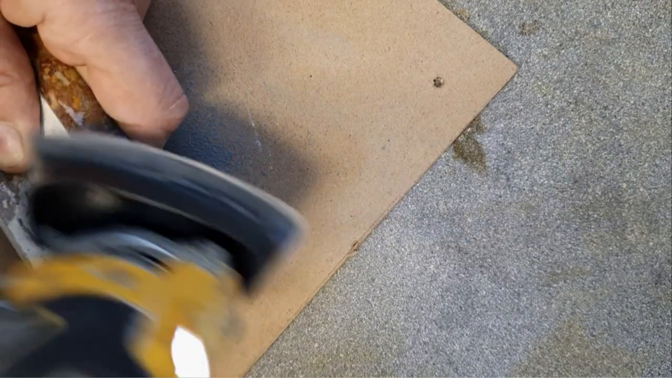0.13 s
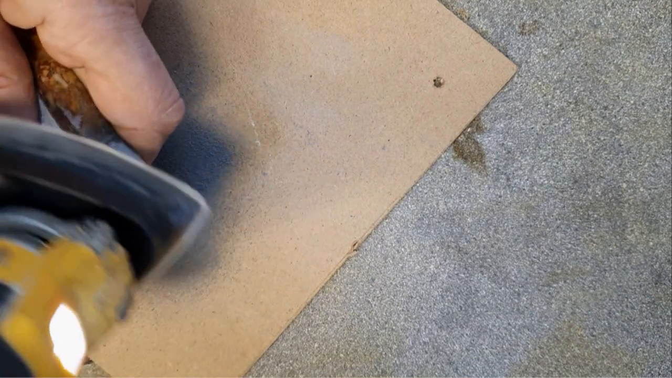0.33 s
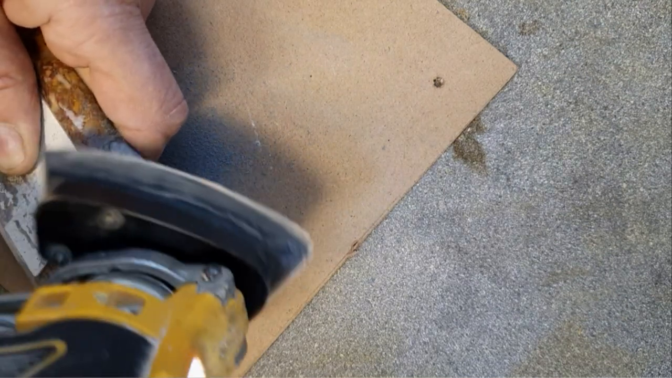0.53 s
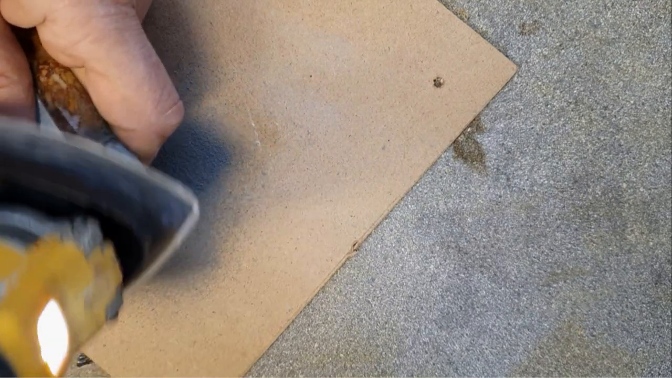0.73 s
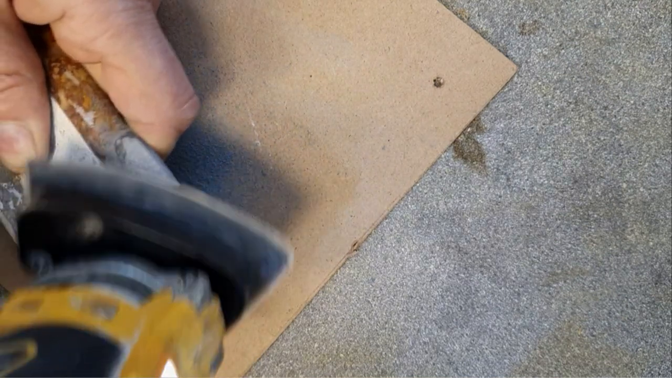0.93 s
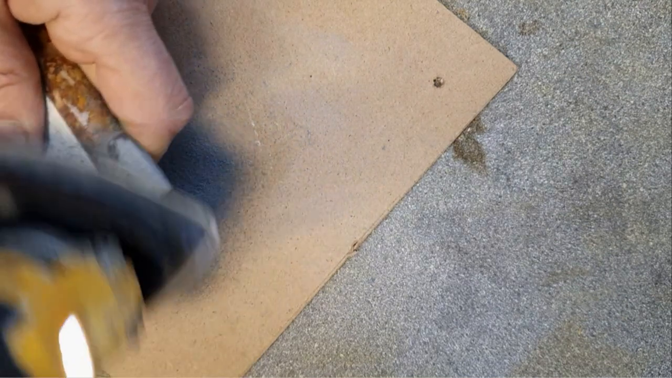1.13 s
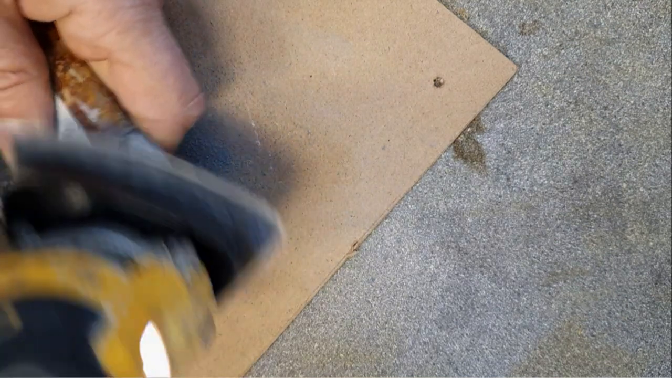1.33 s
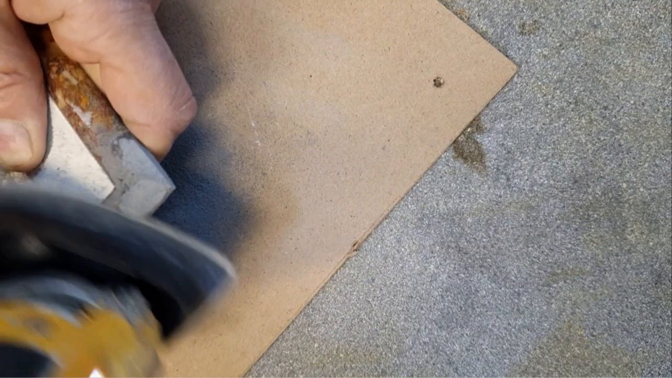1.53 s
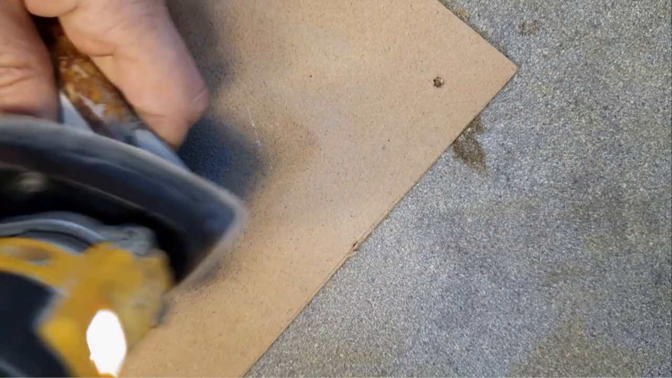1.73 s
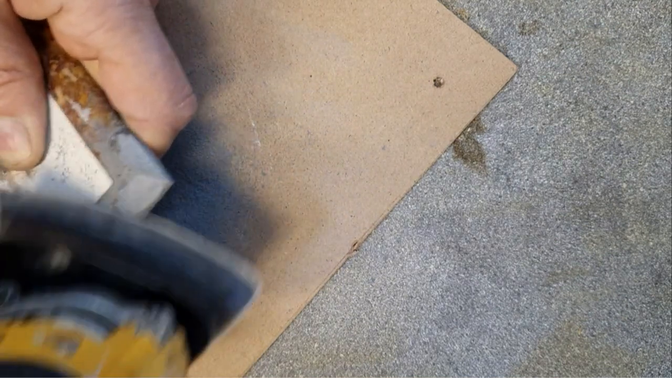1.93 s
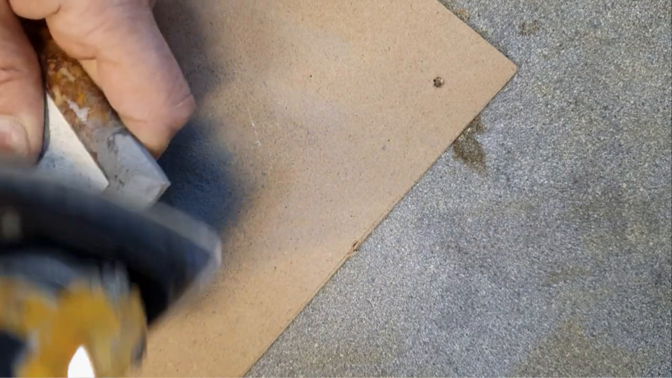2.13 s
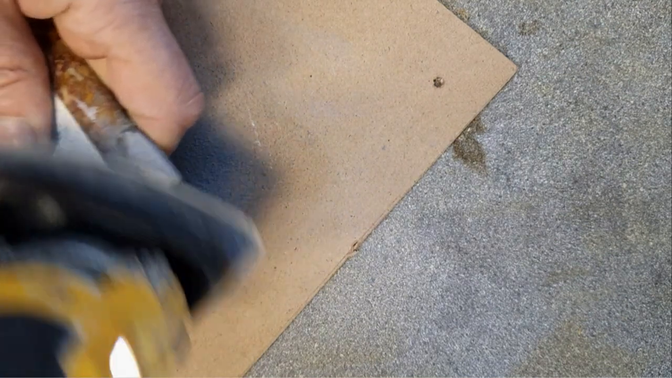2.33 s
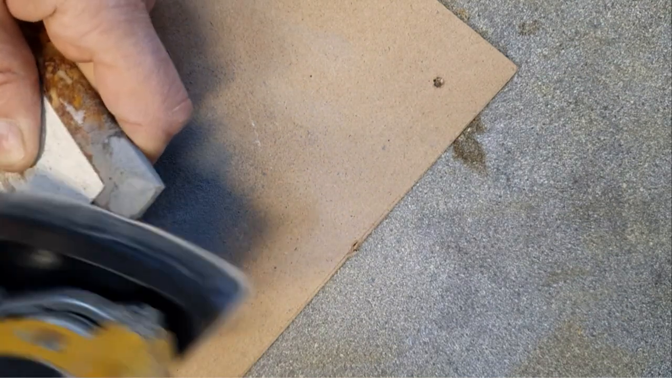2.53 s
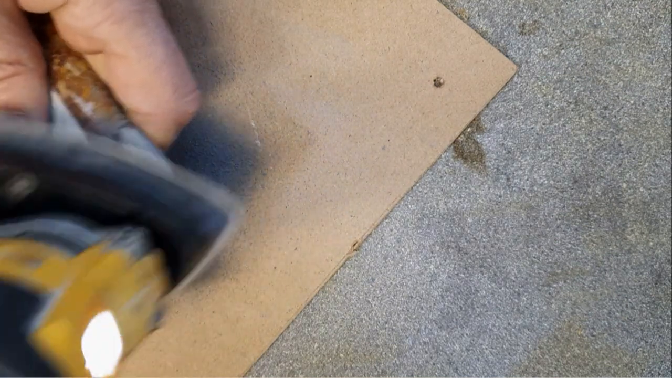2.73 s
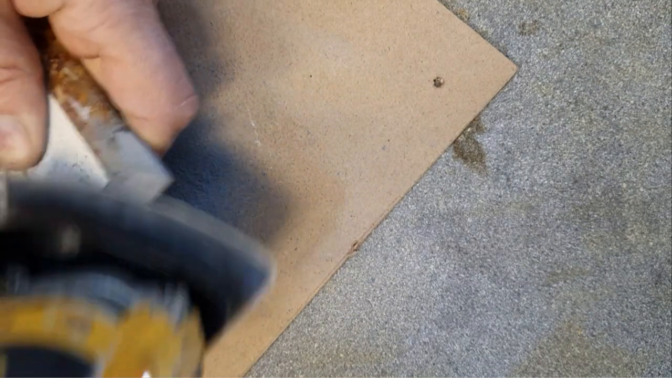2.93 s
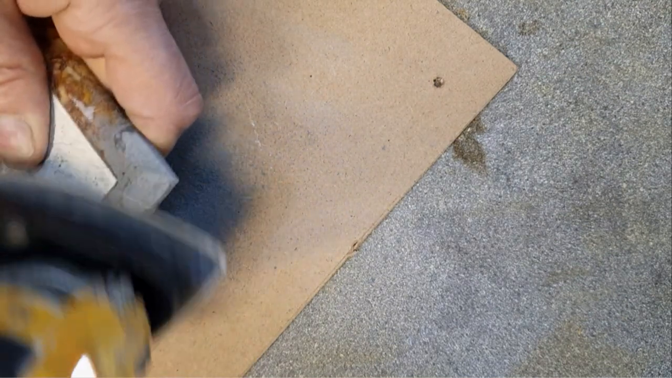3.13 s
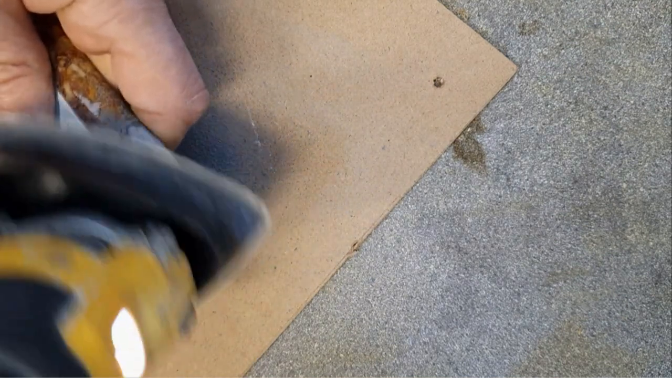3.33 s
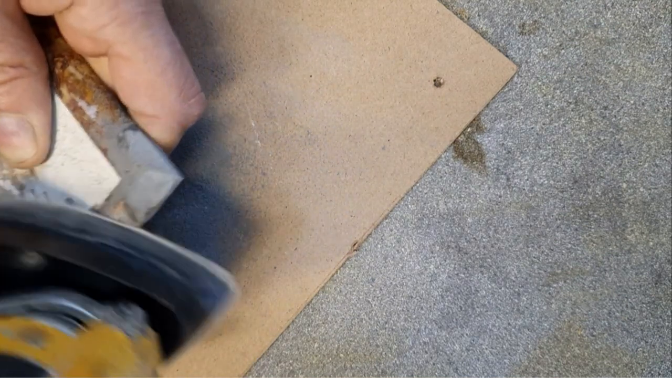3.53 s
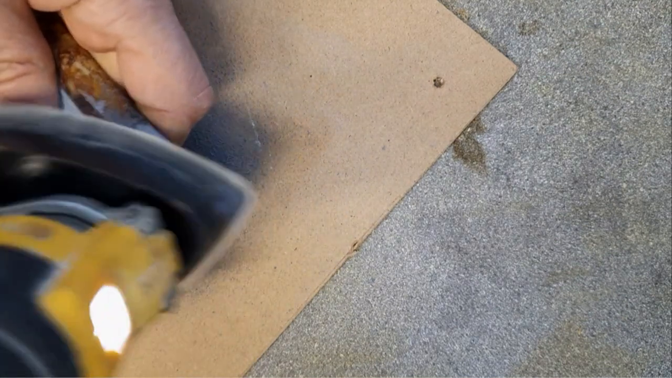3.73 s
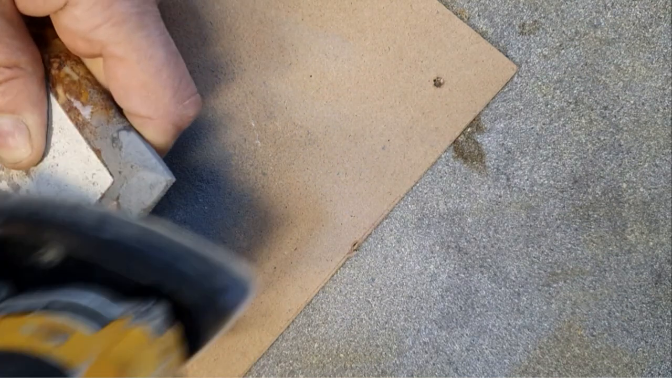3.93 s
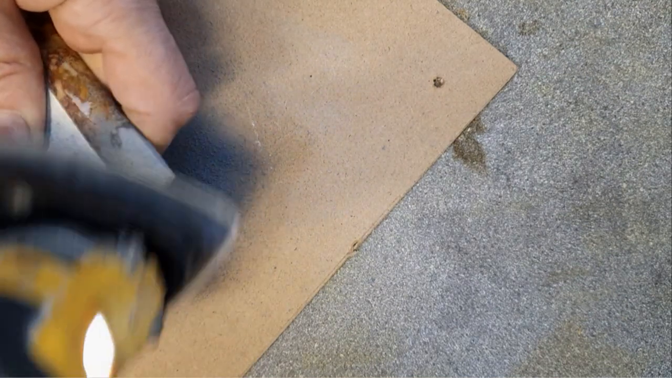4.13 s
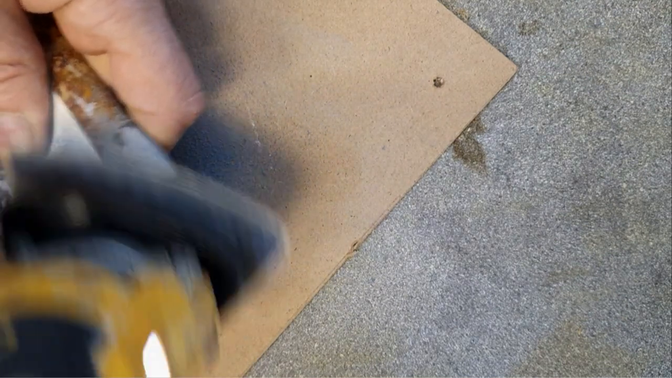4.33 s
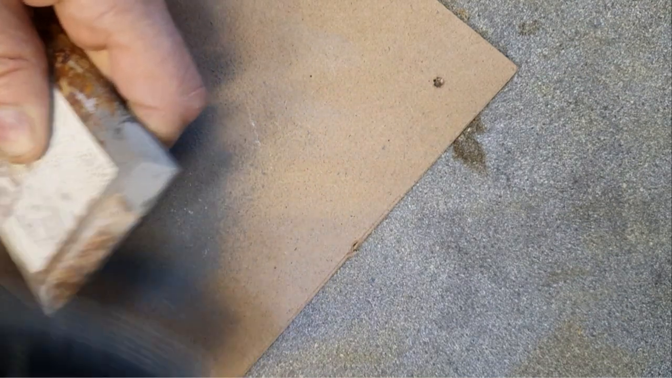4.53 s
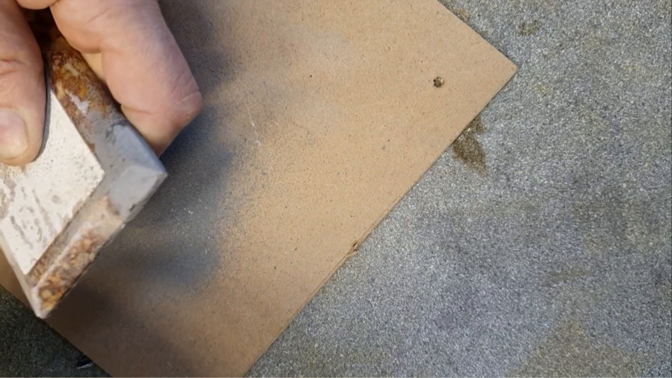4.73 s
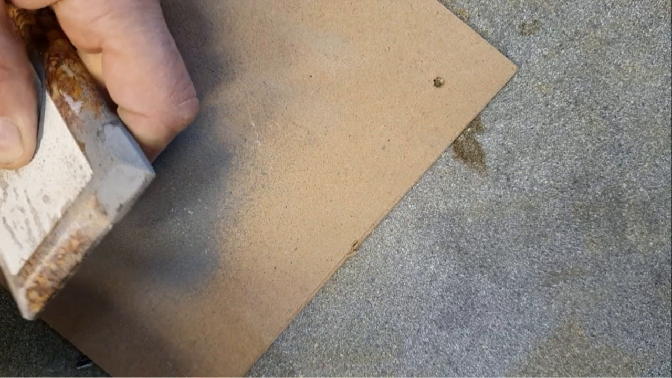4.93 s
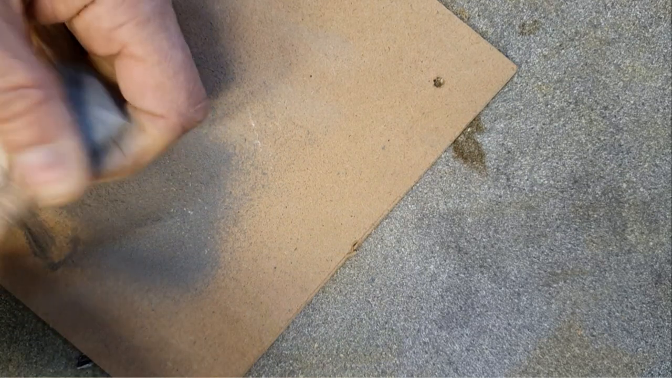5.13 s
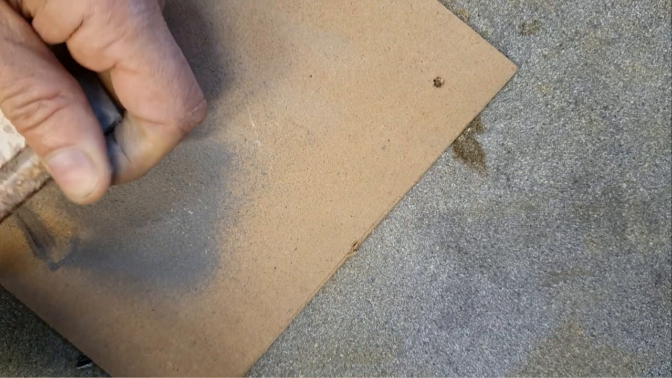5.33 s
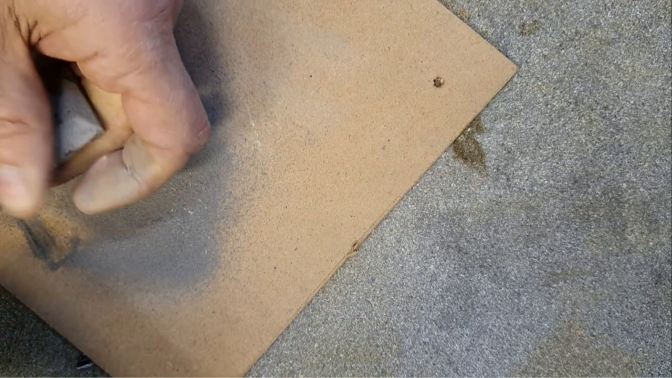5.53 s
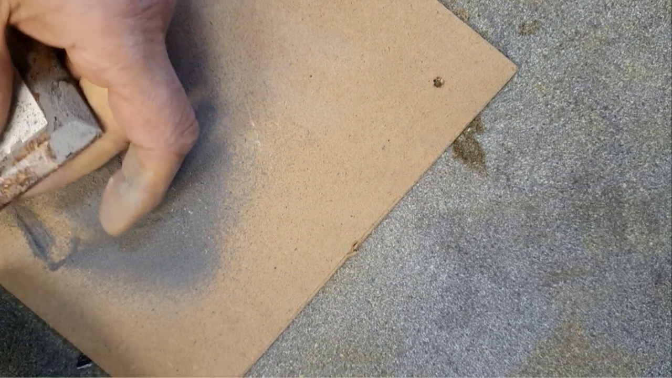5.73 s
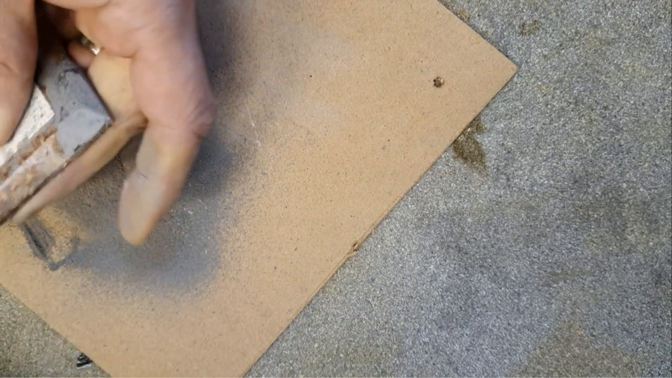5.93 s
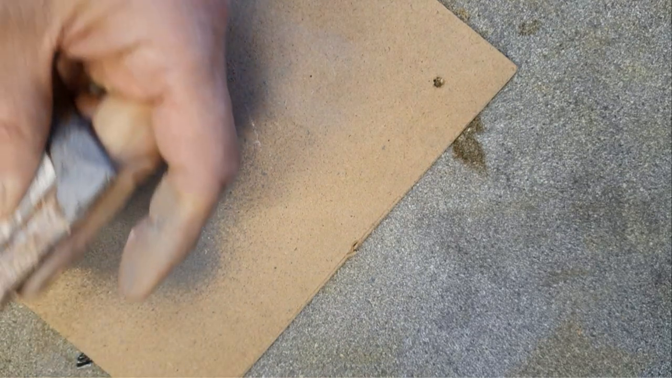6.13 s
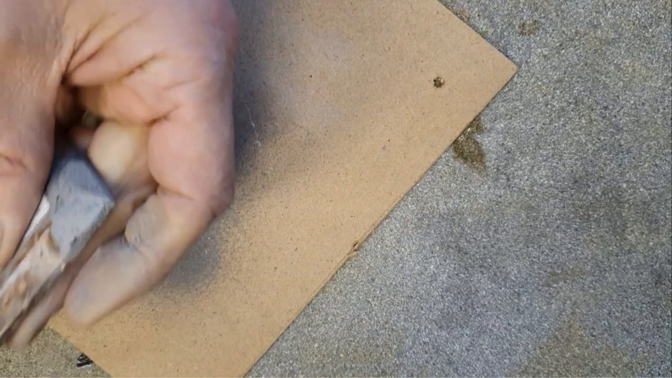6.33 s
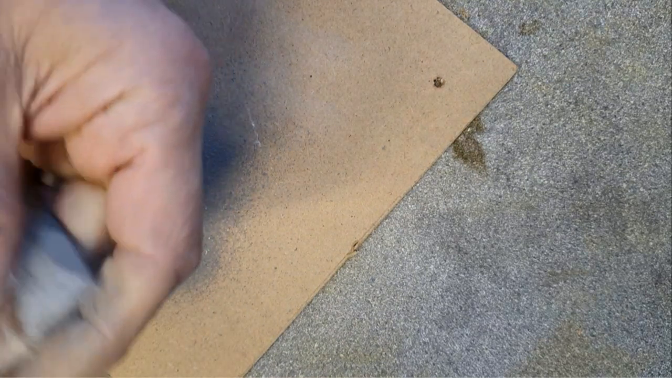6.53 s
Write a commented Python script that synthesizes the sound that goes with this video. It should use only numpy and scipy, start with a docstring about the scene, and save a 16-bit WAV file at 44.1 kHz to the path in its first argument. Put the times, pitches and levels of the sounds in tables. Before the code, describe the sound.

From 0 to about 4.6 seconds an electric oscillating sander runs very close, in stereo: a steady, dense buzz of roughly 215 cycles a second with strong mid overtones, a piercing whine around 3.4 kHz and a dry, bright grit rasp. To-and-fro strokes make the drone swell, bite and briefly drop about every third of a second, with rough chatter at the edge, stronger from 1.4 seconds on. Brief squeals colour the first 1.4 seconds. At 4.6 seconds it howls briefly, brakes and cuts off within a tenth of a second, leaving a short room tail and very quiet air. Around 5.1-5.2 a quick clatter and scrape sound on the bench; near 5.5 comes a faint hollow rub. At 5.86 a dull thump begins a scrape, followed at 6.08 by a harder, booming bump with a small crack. Faint hand brushing closes, at 6.5-6.7.

```python
"""Sanding hard filler, then putting the sander down

An oscillating sander buzzes at a steady speed, built from multiples of its shaft speed, as it is stroked to and fro.
Filtered noise makes the rasp of the grit, and slaps of noise the chatter where the pad rides over the work's edge.
The pad squeals at times; the motor is switched off and brakes, and the tool clatters onto the bench as filtered clicks.
The workpiece is scraped round as noise and bumps the board twice, which booms as dying sines, in a quiet workshop.
"""
import sys
import numpy as np
from scipy import signal
from scipy.fft import rfft, irfft
from scipy.io import wavfile

SR = 44100
rng = np.random.default_rng(int(sys.argv[2]) if len(sys.argv) > 2 else 0)


def output_pcm(signal):
    """Save a mono or channel-first signal as 16-bit PCM at the path in sys.argv[1].

    Samples are clipped to [-1, 1] before scaling.
    """
    pcm = np.clip(np.atleast_2d(signal).T, -1, 1) * 32767
    wavfile.write(sys.argv[1], SR, np.round(pcm).astype(np.int16))


N = 293688
T = np.arange(N) / SR
HZ = np.fft.rfftfreq(N, 1 / SR)


def amp(db):
    """Turns decibels into gain."""
    return 10 ** (np.asarray(db) / 20)


def unit(x):
    """Scales a signal to rms 1."""
    return x / np.sqrt(np.mean(x ** 2) + 1e-20)


def at_hz(points, hz):
    """Reads a spectrum between its points, on a log-frequency axis."""
    f, value = np.transpose(points)
    return np.interp(np.log(hz + 1), np.log(f + 1), value)


def wander(rate_hz):
    """A smooth random drift of rms 1, with little movement faster than about rate_hz."""
    spectrum = rfft(rng.standard_normal(N)) * np.exp(-(HZ / rate_hz) ** 2)
    return unit(irfft(spectrum, N))


def colour(x, points):
    """Shapes x by a causal filter with the given spectrum and unit energy, so only the shape matters."""
    log_gain = np.log(amp(at_hz(points, abs(np.fft.fftfreq(8192, 1 / SR)))))
    minimum_phase = np.exp(signal.hilbert(log_gain).conj())
    taps = np.fft.ifft(minimum_phase).real[:3000]
    taps = taps / np.linalg.norm(taps)
    return signal.oaconvolve(x, taps[None], axes=1)[:, :x.shape[1]]


def pair(same, grain_db=0):
    """Left and right noise of given likeness (0-1), its level jumping every 16 samples by grain_db."""
    grain = np.repeat(rng.standard_normal(N // 16 + 1), 16)[:N]
    a, b = rfft(rng.standard_normal((2, N)) * amp(grain_db * grain))
    same = np.clip(same, -1, 1)
    return unit(irfft(np.array([a, same * a + np.sqrt(1 - same ** 2) * b]), N))


def swells(rows):
    """A bell-shaped gain for each row: centre in seconds, length in seconds, peak in dB."""
    return sum(amp(db) * np.exp(-(2 * (T - s) / length) ** 2) for s, length, db in rows)


def rubs(rows, attack_s, release_db_per_s):
    """Attack, hold and release for each row: start in seconds, length in seconds, level in dB."""
    gain = np.zeros(N)
    for s, length, db in rows:
        attack = np.clip((T - s) / attack_s, 0, 1)
        gain += attack * amp(db - release_db_per_s * np.maximum(T - s - length, 0))
    return gain


def strikes(rows):
    """One single-sample click for each row: time in seconds, level in dB."""
    clicks = np.zeros(N)
    for s, db in rows:
        clicks[round(s * SR)] += amp(db)
    return clicks


def ring(x, modes):
    """Passes x through dying sines, like a struck object: Hz, dB, seconds to fall 60 dB."""
    t = T[:SR]
    response = sum(amp(db - 60 * t / t60) * np.sin(2 * np.pi * hz * t) for hz, db, t60 in modes)
    return signal.oaconvolve(x, response[None], axes=1)[:, :N]


def high_pass(x, hz):
    """A second-order low cut."""
    return signal.sosfilt(signal.butter(2, hz, "high", fs=SR, output="sos"), x)


# The motor, which brakes after the switch is let go.
# Each row: time in seconds, average speed in shaft turns a second.
SHAFT_SPEED = [(0, 214.6), (1.1, 214.7), (1.3, 214.3), (3.7, 214.4), (4.615, 214.3), (4.63, 205),
               (4.645, 182), (4.675, 125)]


def motor_speed():
    """The motor's speed follows its table, with a very small random wander."""
    times, turns_per_s = np.transpose(SHAFT_SPEED)
    return np.interp(T, times, turns_per_s) * (1 + 0.001019 * wander(14))


# At the end of each stroke the pad bites, tips off the work and chatters on its edge.
# Each row: start in seconds, time off the work in seconds, drop of the drone in dB,
# bite around the start in dB, chatter level in dB.
STROKE_TURNS = [(0.223, 0.17, 10, 6, -43), (0.665, 0.14, 12, 6.5, -46), (1.04, 0.12, 9.5, 7, -42.5),
                (1.395, 0.088, 6, 2.5, -35), (1.714, 0.062, 16.5, 2.5, -27.5), (2.061, 0.074, 8, 7.5, -30),
                (2.385, 0.052, 15, 7.5, -31), (2.70, 0.11, 5.5, 6, -30), (3.005, 0.089, 11, 4.5, -28.5),
                (3.36, 0.064, 15.5, 6, -31.5), (3.688, 0.093, 15.5, -2, -28.5), (4.06, .04, 11, 5.5, -33),
                (4.372, 0.057, 18, 3.5, -30.5), (4.61, 0.029, 9, 3, -32)]
FIRST_STROKE_S = 0.39


def stroke_angle(t):
    """The hand goes to and fro once between turns: a full circle from the middle of one to the next."""
    middles = [s + length / 2 for s, length, *_ in STROKE_TURNS]
    times = [middles[0] - FIRST_STROKE_S] + middles
    return 2 * np.pi * np.interp(t, times, np.arange(len(STROKE_TURNS) + 1))


# The pad also bites in mid-stroke when it is pushed harder.
# Each row: centre in seconds, length in seconds, bite in dB.
MID_STROKE_PUSHES = [(0.442, .07, 6.5), (3.6, .1, 9.5), (4.497, .07, 4)]
TIP_S, SETTLE_S = .035, 0.03  # the pad tips off quickly and settles back gradually
DRONE_START_DB, LEAN_DB_PER_S = 0.86, 0.34  # the hand leans harder as the work goes on
BITE_RISE_S, BITE_FALL_S = 0.098, 0.028  # the bite builds up before each turn and dies away after it


def pressure(t):
    """How hard the pad bears on the work: drone of the work and bite of the pad, both in dB."""
    drone = DRONE_START_DB + LEAN_DB_PER_S * t
    bite = sum(db * np.exp(-(2 * (t - s) / length) ** 2) for s, length, db in MID_STROKE_PUSHES)
    for s, length, drop_db, bite_db, _ in STROKE_TURNS:
        age = t - s
        tipped = np.clip(age / TIP_S, 0, 1) * np.exp(-np.maximum(age - length, 0) / SETTLE_S)
        drone = drone - drop_db * tipped
        build_up = np.minimum(age, 0) / BITE_RISE_S
        die_away = (np.maximum(age, 0) / BITE_FALL_S) ** 2
        bite = bite + bite_db * np.exp(build_up - die_away)
    return drone, bite


# Low multiples ("orders") of the shaft speed, from the first up, before pressure and braking change them.
# Each row: left level in dB, right level in dB.
LOW_ORDERS = [(-43, -33), (-43, -28.5), (-35, -40), (-25.5, -29), (-37, -40.5), (-24, -22.5), (-27, -24),
              (-26.5, -25.5), (-25.5, -29), (-27.5, -41), (-33, -37), (-45, -42), (-35.5, -36),
              (-40.5, -37), (-30.5, -32.5), (-23, -27.5), (-30, -30.5)]
# How far the left side leads the right on each of these orders. Each entry: a lead in radians.
LOW_LEADS = [-.8, 2.4, .4, 1, .5, -.1, .4, 1.5, .4, -2.1, .4, 2.9, -2.5, -1.3, -.3, 1.8, 2.1]
# The higher orders follow one broad outline.
# Each row: frequency in Hz, left level in dB, right level in dB.
UPPER_ORDERS = [(3860, -34, -37.5), (3770, -29, -30.5), (4400, -41, -41.5), (5520, -32.5, -47.5),
                (5500, -37.5, -37.5), (6710, -35.5, -45), (7600, -46, -43), (8600, -42, -47),
                (11000, -58.5, -60.5)]
UPPER_LEAD = 1.5  # radians, to the left and right by turns


def order_level(k):
    """Left dB, right dB and left lead of one multiple of the shaft speed."""
    if k <= len(LOW_ORDERS):
        return *LOW_ORDERS[k - 1], LOW_LEADS[k - 1]
    order_hz = k * SHAFT_SPEED[0][1]
    hz, left_db, right_db = np.transpose(UPPER_ORDERS)
    return np.interp(order_hz, hz, left_db), np.interp(order_hz, hz, right_db), UPPER_LEAD * (-1) ** k


RATTLE_DB, RATTLE_FOLLOW = -4.1, 0.069  # rattle of the pad, and the share of the drone's changes it follows
HUM_ARCH_DB, WHINE_ARCH_DB = -0.5, -0.5  # both are slightly weaker in mid-stroke


def contact_level(k, drone, bite, arch, hum_follow=0.65, whine_follow=0.027, top_follow=0.34, bite_share=.4):
    """Change of one order in dB as the pad presses on the work and the hand strokes."""
    # the low hum and the whine come from the tool itself; the middle orders from its contact with the work
    if k == 1:
        return 0 * drone
    if k < 4:
        return (hum_follow * drone + HUM_ARCH_DB * arch) / (k - 1)
    if k < 7:
        return 1.2 * drone if k == 4 else drone
    if k < 12:
        rattle = RATTLE_DB + RATTLE_FOLLOW * drone
        return rattle + (bite if k == 7 else bite_share * bite)
    if k == 16:  # the gear whine
        return whine_follow * drone + WHINE_ARCH_DB * arch
    return top_follow * drone + WHINE_ARCH_DB / 2 * arch


def buzz(angle, speed, dispersion=.36, waver=0.038, waver_hz=18, sway=0.036, ear_lag=.12,
         whine_unrest=0.057, braking_db=70, count=54):
    """Each swing of the pad kicks the tool and the work, giving a row of unsteady orders of the shaft speed."""
    t = T[::128]  # the slow changes are worked out on a coarse clock
    drone, bite = pressure(t)
    # each order loses braking_db for a tenfold drop in speed
    slowing = braking_db * np.log10(np.minimum(np.interp(t, T, speed) / SHAFT_SPEED[0][1], 1))
    moving = np.interp(t, [SHAFT_SPEED[-2][0], SHAFT_SPEED[-1][0]], [1, 0])
    stroke = stroke_angle(t)
    arch = -np.cos(stroke)  # highest in mid-stroke
    out = np.zeros((2, N))
    turn, swing = np.ones(N, complex), np.exp(1j * angle)
    for k in range(1, count):
        turn = turn * swing
        left_db, right_db, lead = order_level(k)
        db = slowing + contact_level(k, drone, bite, arch)
        phase = -dispersion * k ** 2
        if k > 10:
            phase += rng.uniform(0, 2 * np.pi)
        # higher orders waver more, the weak fifth more than its neighbours, the gear whine very little
        unsteady = k * (whine_unrest if k == 16 else 2.6 if k == 5 else 1)
        wavering = waver * unsteady
        # the bench's reflection comes and goes as the tool moves
        share = min(2 * sway * unsteady, .6)
        echo_swing = (1.85 + 0.013 * k) * np.sin(stroke + rng.uniform(0, 2 * np.pi))
        echo_phase = rng.uniform(0, 2 * np.pi) + echo_swing
        for ear, (ear_db, shift) in enumerate([(left_db, lead / 2), (right_db, -lead / 2)]):
            knots = rng.standard_normal((2, int(2 * waver_hz * T[-1]) + 2))
            knot_times = np.linspace(0, T[-1], knots.shape[1])
            unrest = np.interp(t, knot_times, knots[0] + 1j * knots[1])
            echo = share * np.exp(1j * (echo_phase + ear * k * ear_lag))
            gain = moving * amp(ear_db + db) * np.exp(1j * (phase + shift))
            gain = gain * (1 + echo + wavering * unrest)
            gain /= np.sqrt((1 + share ** 2 + wavering ** 2) / 2)
            out[ear] += (np.interp(T, t, gain) * turn).real
    return out


GRIT_DB, GRIT_STOP_S, GRIT_DROP_DB, GRIT_FADE_DB_PER_S = -24.5, 4.665, 13, 260


def friction(stop_s=.02):
    """Level of the grit in dB: steady until the pad stops, then a drop and a short fade."""
    age = np.maximum(T - GRIT_STOP_S, 0)
    return GRIT_DB - GRIT_DROP_DB * np.minimum(age / stop_s, 1) - GRIT_FADE_DB_PER_S * age


# Tone of the sanding noise. Each row: frequency in Hz, relative level in dB per Hz.
GRIT_COLOUR = [(25, -32), (70, -22), (320, -18), (550, -10.5), (900, -4.5), (2600, 3.5), (3500, 2),
               (5200, -2.5), (7400, -4.5), (8600, -2.5), (10500, -6.5), (15000, -11.5)]
# How alike its left and right are. Each row: frequency in Hz, likeness from 0 to 1.
GRIT_LIKENESS = [(100, 1), (500, 0), (1500, 0.17), (3000, 0), (12000, 0)]
# Its balance. Each row: frequency in Hz, left minus right in dB.
GRIT_LEFT_RIGHT = [(200, 1), (2000, 1.5), (5500, 1.5), (8000, 3.5), (9200, -1), (12000, -0.5)]
GRIT_ARCH_DB = -0.22  # slightly weaker in mid-stroke


def rasp(angle, flicker_db=1, skate=0.14, body_follow=0.69, body_hz=1200, mirror=0.26, mirror_s=.00022,
         mirror_move=.2):
    """Grit scratches on both halves of each swing; its body follows the pressure, its hiss rises as the pad skates."""
    pad_speed = 1 + .55 * np.cos(2 * angle) + .08 * np.cos(angle)
    gate = unit(pad_speed) * amp(flicker_db * wander(60))
    grit = colour(pair(at_hz(GRIT_LIKENESS, HZ), grain_db=-1.0) * gate, GRIT_COLOUR)
    # a bounce off the moving tool body cuts drifting notches
    late = T - mirror_s * (1 + mirror_move * wander(4.2))
    grit = unit(np.array([ear + mirror * np.interp(late, T, ear) for ear in grit]))
    spectrum = rfft(grit) * amp(np.outer([.5, -.5], at_hz(GRIT_LEFT_RIGHT, HZ)))
    low = 1 / (1 + (HZ / body_hz) ** 6)
    drone, _ = pressure(T)
    body = irfft(spectrum * low, N) * amp(body_follow * drone)
    hiss = irfft(spectrum * (1 - low), N) * amp(-skate * drone)
    return (body + hiss) * amp(friction() - GRIT_ARCH_DB * np.cos(stroke_angle(T)))


# Something nearby rings along with the buzz.
# Each row: frequency in Hz, level in dB, seconds to fall 60 dB.
SYMPATHY_MODES = [(852, -84, .7), (1062, -75, .7)]


def sympathetic_ring(sander):
    """A nearby object rings at its own pitches when the sander's sound drives it."""
    return ring(sander, SYMPATHY_MODES)


# Tone of the quiet background. Each row: frequency in Hz, relative level in dB per Hz.
AIR_COLOUR = [(25, -0.5), (115, 2), (400, -29), (5000, -34.5), (9300, -23.5), (15000, -27.5)]
AIR_DB = -75.5


def background_air():
    """Steady, very soft filtered noise, much alike on both sides."""
    return amp(AIR_DB) * colour(pair(.8), AIR_COLOUR)


# How fast the workshop's echo dies. Each row: frequency in Hz, seconds to fall 60 dB.
ROOM_DECAY = [(100, 0.56), (450, .3), (900, 0.27), (3000, 0.27), (8000, 0.22), (15000, 0.062)]


def room(x):
    """A short workshop tail of noise, each band dying at its own speed."""
    hz, t, z = signal.stft(rng.standard_normal((2, SR // 2)), SR, nperseg=256)
    decay = amp(-60 * t / at_hz(ROOM_DECAY, hz)[:, None])
    tail = signal.istft(z * decay, SR, nperseg=256)[1]
    tail *= np.clip(T[:tail.shape[1]] / 0.023, 0, 1)  # the tail builds up over 23 ms
    return signal.fftconvolve(x, tail / np.linalg.norm(tail[0]), axes=1)[:, :N]


def locked_mode(angle, rows, order):
    """A mode of the pad locks on to one order of the swing, 4 dB stronger on the left."""
    return swells(rows) * np.cos(order * angle + .5 * wander(25)) * amp([[4], [0]])


# Squeals of the pad. Each row: centre in seconds, length in seconds, peak on the right in dB.
PAD_SQUEALS = [(.14, 0.15, -25), (.56, 0.13, -25.5), (.99, 0.11, -30), (1.34, .12, -29.5),
               (4.6, 0.087, -29)]


def squeal(angle):
    """The pad squeals briefly on its twentieth order."""
    return locked_mode(angle, PAD_SQUEALS, order=20)


# Tone of the chatter. Each row: frequency in Hz, relative level in dB per Hz.
CHATTER_COLOUR = [(250, -34.5), (1200, 2), (1800, 5), (2600, -17.5), (3500, -5), (4600, -9), (15000, -28.5)]
CHATTER_SHARE = 0.68  # it holds for this share of the time off the work, then fades
CHATTER_ATTACK_S, CHATTER_RELEASE_DB_PER_S = .018, 324.5


def chatter(angle, sharpness=1.2, uneven_db=3.5):
    """On an edge the pad slaps the work unevenly, once a swing."""
    slaps = unit(np.exp(sharpness * np.cos(angle)) * amp(uneven_db * wander(120)))
    edges = [(s, CHATTER_SHARE * length, db) for s, length, _, _, db in STROKE_TURNS]
    slapping = colour(pair(0.42) * slaps, CHATTER_COLOUR)
    return slapping * rubs(edges, CHATTER_ATTACK_S, CHATTER_RELEASE_DB_PER_S)


# A howl as the pad leaves the work. Each row: centre in seconds, length in seconds, peak on the right in dB.
PAD_HOWL = [(4.599, 0.069, -20)]


def howl(angle):
    """The pad howls on its eighth order."""
    return locked_mode(angle, PAD_HOWL, order=8)


# Things slide on the bench. Each row: start in seconds, length in seconds, level in dB.
BENCH_SLIDES = [(5.114, 0.042, -36.5), (5.182, 0.046, -42.5), (5.404, 0.09, -65.5), (5.497, .05, -53.5),
                (5.86, 0.32, -39.5), (6.01, .075, -37)]
# Tone of the scraping. Each row: frequency in Hz, relative level in dB per Hz.
SCRAPE_COLOUR = [(80, 3.5), (300, 2), (550, 3), (900, 2.5), (1500, -6), (2500, -15.5), (3250, -13),
                 (3900, -17), (4800, -32), (15000, -43)]
SLIDE_ATTACK_S, SLIDE_RELEASE_DB_PER_S = 0.0057, 350


def scrapes():
    """Rough sliding contact makes grainy noise whose level flickers."""
    noise = pair(0.43, grain_db=1) * amp(1.45 * wander(90))
    return colour(noise, SCRAPE_COLOUR) * rubs(BENCH_SLIDES, SLIDE_ATTACK_S, SLIDE_RELEASE_DB_PER_S)


# Hard parts knock on the bench. Each row: time in seconds, relative level in dB.
BENCH_KNOCKS = [(5.1175, -10.5), (5.1325, -12.5), (5.1435, -13), (5.152, -19), (5.1615, -18), (5.184, -18),
                (5.1945, -21), (5.219, -22), (5.404, -46), (5.505, -32.5), (5.923, -22), (6.055, -14),
                (6.082, -19), (6.203, -27)]
# Tone of a knock. Each row: frequency in Hz, relative level in dB per Hz.
KNOCK_COLOUR = [(40, -10), (90, 13), (200, -18), (600, -3.5), (1100, 12.5), (2000, 2), (2600, -22),
                (3300, 3.5), (4500, -27), (9000, -32), (15000, -56)]


def knocks(knock_db=7.0):
    """Each hard contact is a filtered click, 8 dB stronger on the left."""
    clicks = strikes(BENCH_KNOCKS) * amp([[knock_db + 0.5], [knock_db - 7.5]])
    return colour(clicks, KNOCK_COLOUR)


# The block is turned in the hand. Each row: start in seconds, length in seconds, level in dB.
BLOCK_RUB = [(5.46, 0.083, -51.5)]
# Its hollow tone. Each row: frequency in Hz, relative level in dB per Hz.
HOLLOW_COLOUR = [(100, -16), (350, -5), (520, 2), (720, -6), (1100, -19), (4000, -42)]


def hollow_rub():
    """Skin rubbing the block gives a soft noise with a hollow peak."""
    return colour(pair(0.68), HOLLOW_COLOUR) * rubs(BLOCK_RUB, attack_s=.055, release_db_per_s=280)


def handling():
    """Scraping, knocks and rubbing make the block and a metal part ring along."""
    contacts = scrapes() + knocks() + hollow_rub()
    return contacts + ring(contacts, [(565, -52, 0.068), (3144, -43, 0.033), (3252, -33, 0.047)])


# Soft grainy hiss: the first row comes with the long scrape on the bench, the later rows are a hand brushing
# near the microphone. Each row: start in seconds, length in seconds, level in dB.
SOFT_HISSES = [(5.85, 0.36, -59), (6.48, 0.086, -64.5), (6.58, 0.089, -57)]
# Tone of the brushing. Each row: frequency in Hz, relative level in dB per Hz.
BRUSHING_COLOUR = [(40, 7), (90, 9), (280, -14), (1400, -12), (2200, -19), (3200, -9), (6000, -21),
                   (9500, -13), (15000, -26)]
BRUSH_ATTACK_S, BRUSH_RELEASE_DB_PER_S = 0.011, 180


def brush():
    """Light rubbing makes faint, grainy noise."""
    noise = colour(pair(0.27, grain_db=2.0), BRUSHING_COLOUR)
    return noise * rubs(SOFT_HISSES, BRUSH_ATTACK_S, BRUSH_RELEASE_DB_PER_S)


# Heavy bumps; the last two rows fall almost together.
# Each row: time in seconds, level in dB, extra level of the bench's lowest sway in dB.
BOARD_BUMPS = [(5.863, -16, -3), (6.078, -24.5, 11.5), (6.0832, -11, -7)]
# How the board rings. Each row: frequency in Hz, level in dB, seconds to fall 60 dB.
BOARD_MODES = [(100.5, 1, 0.15), (152, -1, 0.13), (187, -13.5, 0.18), (242, -7, 0.14), (355, -10.5, 0.13),
               (517, -30, 0.25)]
# The bench's lowest sway. Each row: frequency in Hz, level in dB, seconds to fall 60 dB.
SWAY_MODES = [(66.4, -2.5, 0.36)]


def bumps(rumble_db=-26, rumble_t60=0.75, low_cut_hz=52):
    """The board booms under each bump, the bench sways and trembles on."""
    blows = strikes([(s, db) for s, db, low_db in BOARD_BUMPS])[None]
    shoves = strikes([(s, db + low_db) for s, db, low_db in BOARD_BUMPS])[None]
    tremble = signal.oaconvolve(blows[0], amp(-60 * T[:SR] / rumble_t60))[:N]
    rumble = colour(pair(1.0), [(25, -29), (65, 3), (130, 1), (300, -21), (5000, -93)])
    boom = ring(blows, BOARD_MODES) + ring(shoves, SWAY_MODES) + amp(rumble_db) * tremble * rumble
    return signal.sosfilt(signal.butter(4, [low_cut_hz, 680], "band", fs=SR, output="sos"), boom)


def snap(level_db=-42, t60=0.097):
    """The hardest bump comes with a short bright crack of noise, starting 3 ms before it."""
    age = T - BOARD_BUMPS[-1][0] + .003
    crack = colour(pair(.4), [(300, -7), (3000, -1), (6000, -2), (15000, -5.5)])
    return crack * (age > 0) * amp(level_db - 60 * np.maximum(age, 0) / t60)


def scene():
    """The sander, then the handling, in a quiet workshop."""
    speed = motor_speed()
    angle = 2 * np.pi * np.cumsum(speed) / SR
    tone = buzz(angle, speed)
    noise = rasp(angle) + squeal(angle) + chatter(angle)
    bench = handling() + bumps() + snap()
    direct = tone + noise + howl(angle) + bench + brush()
    tone_to_room = amp(-18.5) * high_pass(high_pass(tone, hz=750), hz=600)
    wet = room(tone_to_room + amp(-13.0) * noise + amp(-28.5) * bench)
    return direct + sympathetic_ring(tone + noise) + background_air() + wet


MIC_LOW_CUT_HZ, EDGE_HZ = 31, 15500


def record(dry):
    """The microphone's low cut and the recorder's steep upper band limit."""
    dry = high_pass(dry, MIC_LOW_CUT_HZ)
    band_limit = signal.firwin(511, EDGE_HZ, window=("kaiser", 9), fs=SR)
    return signal.oaconvolve(dry, band_limit[None], "same")


dry = scene()
out = record(dry)
output_pcm(out)
```